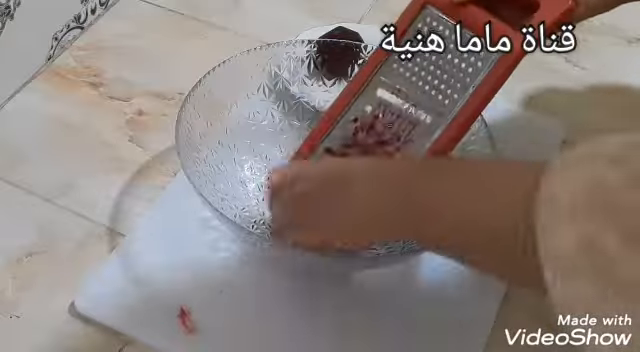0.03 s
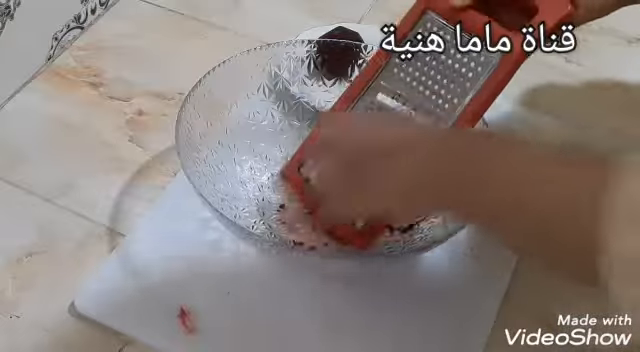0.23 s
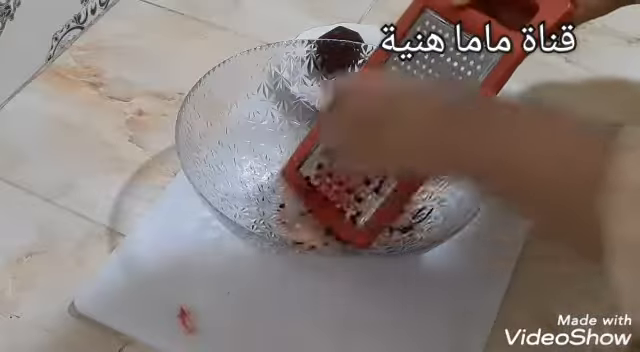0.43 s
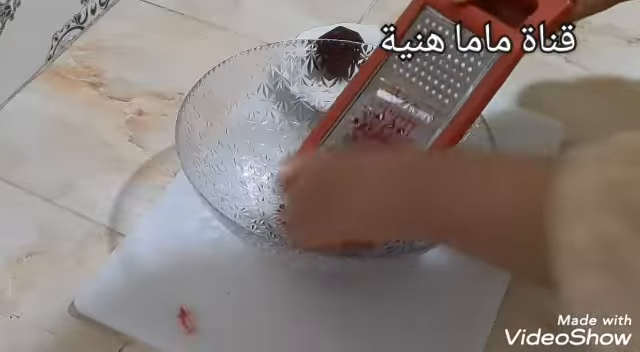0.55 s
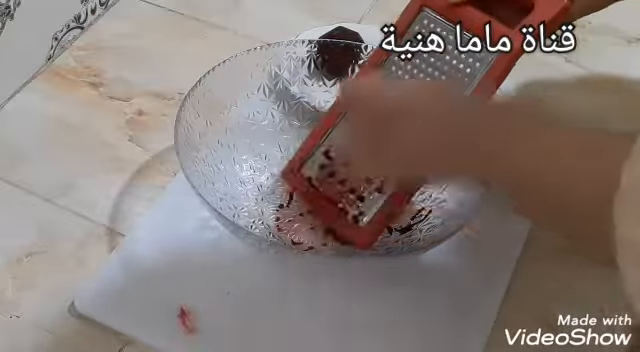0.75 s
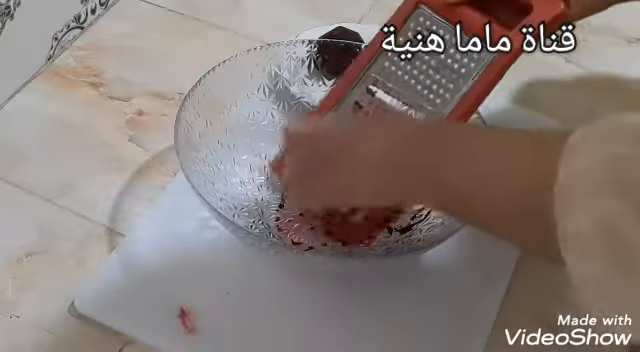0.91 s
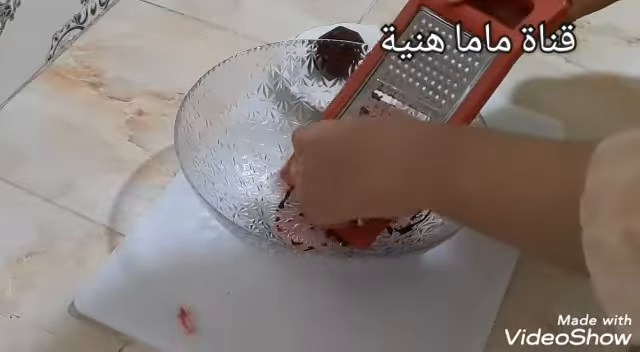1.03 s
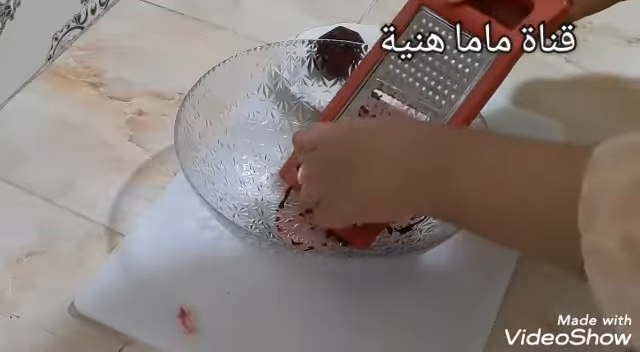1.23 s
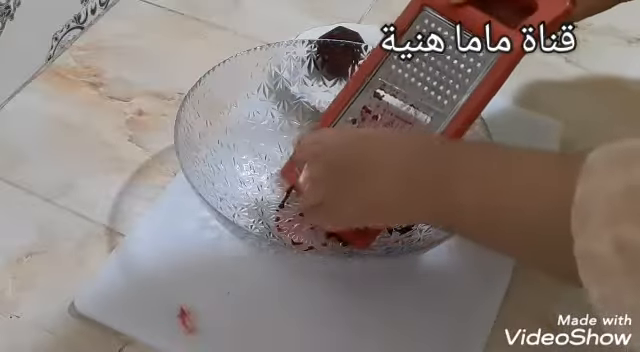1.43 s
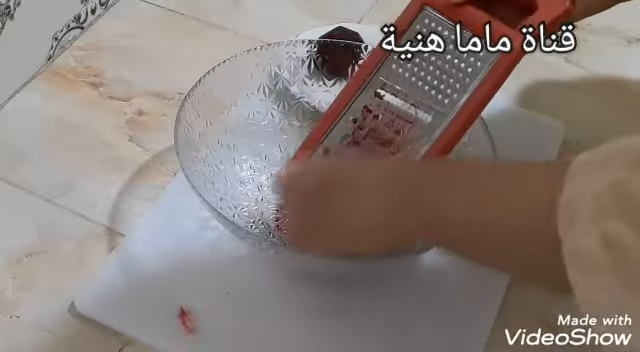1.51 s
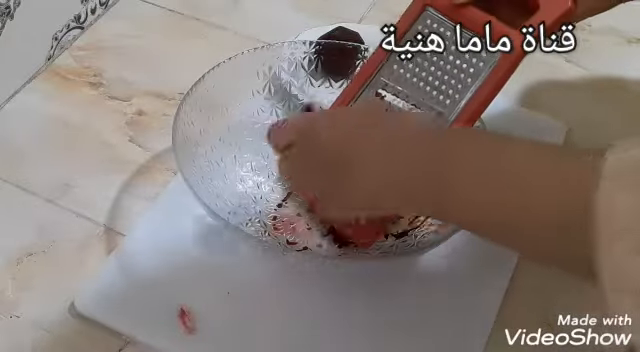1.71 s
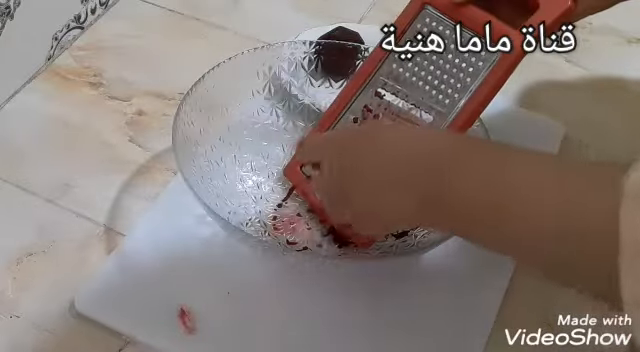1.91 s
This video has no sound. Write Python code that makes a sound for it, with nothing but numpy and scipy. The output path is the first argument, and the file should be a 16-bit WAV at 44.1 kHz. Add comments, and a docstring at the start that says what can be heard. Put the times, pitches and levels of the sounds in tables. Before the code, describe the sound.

A vegetable rasps wetly on a metal grater, which knocks against a glass bowl.

```python
"""A beetroot is pushed down a flat metal grater that stands in a glass bowl, in a hard, echoing kitchen.
The teeth tear the flesh with a wet rasp, a dense train of tiny impulses, while drag makes the frame drone.
Most strokes bump the grater on the bowl, and each impact excites the damped modes of both.
After the third full stroke the grater knocks hard; after the last one it settles with dull thuds."""
import sys
import numpy as np
from scipy import signal
from scipy.fft import rfft, irfft
from scipy.io import wavfile

SR = 44100
rng = np.random.default_rng(int(sys.argv[2]) if len(sys.argv) > 2 else 0)


def digitize_waveform(pressure):
    """Quantize a signal to 16-bit integers and store it at the path in sys.argv[1].

    Rows of a 2-D input are taken as channels; values are limited to [-1, 1].
    """
    field = np.atleast_2d(pressure).T
    bounded = np.clip(field, -1, 1)
    quanta = np.round(bounded * 32767).astype(np.int16)
    wavfile.write(sys.argv[1], SR, quanta)


N = 85995
TIME, BIN_HZ = np.arange(N) / SR, np.fft.rfftfreq(N, 1 / SR)


def from_db(db):
    """Amplitude ratio of a level in decibels."""
    return 10 ** (np.asarray(db) / 20)


def rms_one(x):
    """Normalisation to unit rms."""
    return x / np.sqrt(np.mean(x ** 2) + 1e-20)


def at_hz(points, hz):
    """Interpolation on a logarithmic frequency axis."""
    points = np.array(points)
    return np.interp(np.log(np.maximum(hz, 1)), np.log(points[:, 0]), points[:, 1])


def coloured(x, spectrum):
    """Spectral shaping of a steady sound, at unit rms."""
    return rms_one(irfft(rfft(x) * from_db(at_hz(spectrum, BIN_HZ)), N))


def butter(x, hz, kind, order=2):
    """Causal Butterworth filtering."""
    return signal.sosfilt(signal.butter(order, hz, kind, fs=SR, output="sos"), x + 1e-18)


def ring(x, hz, t60_s):
    """Damped oscillator: a unit impulse excites a decaying sine."""
    radius, angle = from_db(-60 / (t60_s * SR)), 2 * np.pi * hz / SR
    return signal.lfilter([0, np.sin(angle)], [1, -2 * radius * np.cos(angle), radius ** 2], x + 1e-18)


def click(start_s, level_db):
    """An ideal impulse."""
    return from_db(level_db) * (np.arange(N) == int(start_s * SR))


def grains(per_s, spread_db=0):
    """Shot noise: impulses of random sign at random times, equal in size at zero spread."""
    sizes = from_db(spread_db * np.minimum(rng.exponential(1, N), 5))
    return sizes * rng.choice([-1, 1], N) * (rng.random(N) < per_s / SR)


# strokes over the teeth: start_s, rise_s, hold_s, release_s, tear_db, hiss_db, drone_db
STROKES = [(-0.03, 0.023, 0.01, 0.072, -48.5, -46, -61.5), (0.189, 0.094, 0.018, 0.038, -40.5, -37, -65.5),
           (0.484, 0.062, 0.026, 0.028, -36.5, -33, -58), (0.771, 0.067, 0.019, 0.039, -37.5, -34, -53),
           (0.91, 0.025, 0.086, 0.042, -47, -51, -61), (1.454, 0.089, 0.0028, 0.031, -38, -38, -60)]


def stroke_envelope(levels_db, lag_s=0):
    """Amplitude envelope: each stroke swells, holds and decays exponentially."""
    envelope = 0
    for (start_s, rise_s, hold_s, release_s, *_), level_db in zip(STROKES, levels_db):
        age = TIME - start_s - lag_s
        swell = np.sin(np.pi / 2 * np.clip(age / rise_s, 0, 1)) ** 2
        decay = np.exp(-np.maximum(age - rise_s - hold_s, 0) / release_s)
        envelope += from_db(level_db) * swell * decay
    return envelope


# spectra of tearing fibres and of bursting cells: frequency_hz, density_db
TEAR_SPECTRUM = [(60, -16), (130, -13), (200, -22), (330, -7), (480, -12), (600, -5), (720, 0), (900, -2),
                 (1180, 1), (1500, -5), (2000, 0), (3000, -2), (3500, -7), (4500, -4), (8000, -14),
                 (14000, -28)]
HISS_SPECTRUM = [(400, -40), (1500, -20), (3000, -6), (3500, -6), (4400, 0), (6000, -1), (8200, 1.2),
                 (9200, -2), (10200, -6.5), (12300, -3), (15000, -4.5)]
# modes of the toothed sheet: pitch_hz, relative_level_db, t60_s
SHEET_MODES = [(1228, -27, .1), (2450, -25, .08), (4450, -20, .06), (8115, -22, .06)]


def rasp():
    """Modulated shot noise: fibres tear and cells burst as rows of teeth catch; the sheet resonates."""
    tear_db, hiss_db = np.transpose(STROKES)[4:6]
    catch = rms_one(butter(rng.standard_normal(N), 44.5, "low"))
    tear_flutter, hiss_flutter = from_db(1.5 * catch), from_db(3.5 * catch)
    # juice hisses first; the flesh tears once the teeth are in
    tear = coloured(grains(per_s=1500), TEAR_SPECTRUM) * stroke_envelope(tear_db, lag_s=0.0027)
    hiss = coloured(grains(per_s=6000), HISS_SPECTRUM) * stroke_envelope(hiss_db, lag_s=-0.0038)
    cutting = tear * tear_flutter + hiss * hiss_flutter
    sheet = sum(from_db(db) * rms_one(ring(cutting, hz, t60_s)) for hz, db, t60_s in SHEET_MODES)
    return cutting + np.std(cutting) * sheet


# low modes of frame, bowl and table: pitch_hz, gain_db, t60_s
FRAME_MODES = [(77, -14, .25), (103, -10, .18), (131, -7, .18), (157, -12, .15), (245, 1, .1),
               (318, 8, .075), (346, 1, .1)]


def frame():
    """Forced and free vibration: the low modes drone under drag and thud just after each knock."""
    drone_db, thud_lag_s = np.transpose(STROKES)[-1], 0.007
    drag = from_db(-24) * rng.standard_normal(N) * stroke_envelope(drone_db)
    blows = sum(click(start_s + thud_lag_s, thud_db) for start_s, *_, thud_db in KNOCKS)
    force = butter(blows + drag, 420, "low", order=4)
    return sum(from_db(db) * ring(force, hz, t60_s) for hz, db, t60_s in FRAME_MODES)


# likeness of the room's sound at the two ears: frequency_hz, correlation
EAR_CORRELATION = [(80, 0.98), (160, 0.93), (300, 0.5), (600, 0.98), (1100, -0.19), (3000, 0.014),
                   (12000, -0.016)]


def diffuse_noise():
    """Diffuse field: white stereo noise, correlated between the ears mainly at low frequencies."""
    correlation = at_hz(EAR_CORRELATION, BIN_HZ)
    mid, side = rfft(rng.standard_normal((2, N)))
    mid_gain, side_gain = np.sqrt((1 + correlation) / 2), np.sqrt((1 - correlation) / 2)
    return irfft(mid_gain * mid + side_gain * side * [[1], [-1]], N)


# spectrum of the room's background: frequency_hz, density_db
BACKGROUND_SPECTRUM = [(25, 1), (45, -21.5), (75, 6), (125, 7), (190, -9), (330, -3.5), (550, -22),
                       (1500, -11.5), (4000, -26.5), (8000, -22), (11000, -30), (14000, -29)]


def background():
    """Ambient noise: a faint, steady diffuse field, strongest in the bass."""
    return from_db(-60) * coloured(diffuse_noise(), BACKGROUND_SPECTRUM)


# reverberation time of the kitchen: frequency_hz, t60_s
ROOM_T60 = [(100, 1), (300, 1), (1000, 0.56), (2500, .58), (5000, 0.51), (9000, 0.46), (15000, 0.27)]
# spectrum of its echoes: frequency_hz, gain_db
ROOM_COLOUR = [(100, 0), (190, -2), (350, 0), (650, 0), (1200, 1), (2300, 1), (4300, 0), (12000, 0)]


def kitchen_response():
    """Reverberation: dense echoes decay exponentially in each band, the treble fastest."""
    gap_s = build_s = 0.00067
    build_up = 1 - np.exp(-np.maximum(TIME - gap_s, 0) / build_s)
    early_boost = 1 + from_db(-0.5) * np.exp(-TIME / 0.016)  # reflections from table and near walls
    noise_spectrum = rfft(diffuse_noise())
    centres_hz = np.geomspace(100, 15000, 9)
    response = 0
    for centre_hz, one_band in zip(centres_hz, np.eye(len(centres_hz))):
        share = np.interp(BIN_HZ, centres_hz, one_band)
        decay = from_db(-60 * TIME / at_hz(ROOM_T60, centre_hz))
        band = irfft(noise_spectrum * share, N) * build_up * early_boost * decay
        band *= np.sqrt(2 * np.mean(share ** 2) / np.sum(band ** 2))  # energy follows bandwidth
        response += band * from_db(at_hz(ROOM_COLOUR, centre_hz))
    return response


def in_kitchen(x, direct_db, room_db, right_lag_s=0.00034):
    """Direct and reverberant field: a source reaches the left ear first, then its own echoes follow."""
    direct = np.array([x, np.interp(TIME - right_lag_s, TIME, x)])
    echoes = signal.fftconvolve(x[None], kitchen_response(), axes=1)[:, :N]
    return from_db(direct_db) * direct + from_db(room_db) * echoes


# impacts of grater on bowl: start_s, level_db, pitch_hz, crack_relative_db, thud_db
KNOCKS = [(0.2011, -35.5, 670, -11, -41.5), (0.268, -29, 970, -17, -44.5), (0.4882, -29.5, 760, -9, -40.5),
          (0.7777, -30, 890, -9, -45.5), (0.941, -41, 920, -10, -64), (0.9784, -14, 980, -4.5, -37.5),
          (1.569, -61, 400, -2, -39.5), (1.659, -26.5, 218, -30, -43), (1.6652, -29, 1060, 0.5, -62),
          (1.6786, -26, 570, -13, -61.5)]
# modes of the glass bowl: pitch_hz, gain_db, t60_s
BOWL_MODES = [(392, -18.5, 0.08), (597, -23, 0.13), (680, -23.5, .08), (809.5, -35, 0.24), (975, -41.5, .1),
              (1168, -34, 0.069), (1762, -17, 0.049), (2430, -30, 0.043)]


def knocks():
    """Impact excitation: each contact clacks, pitched by hardness, and rings the bowl; hard ones crack."""
    edge_ratio, crack_lag_s = 1.472, 0.0007
    clack = sum(butter(click(start_s, db), [hz / edge_ratio, hz * edge_ratio], "band", order=3)
                for start_s, db, hz, *_ in KNOCKS)
    force = sum(click(start_s, db) for start_s, db, *_ in KNOCKS)
    bowl = sum((-1) ** k * from_db(db) * ring(force, hz, t60_s)
               for k, (hz, db, t60_s) in enumerate(BOWL_MODES))
    snap = sum(click(start_s + crack_lag_s, db + crack_db) for start_s, db, _, crack_db, _ in KNOCKS)
    crack = butter(snap, [1590, 3800], "band", order=3)
    tick = butter(snap, 8200, "low")
    return from_db(32) * clack + bowl + from_db(18.5) * crack + from_db(10.5) * tick


# landings of the beetroot on the teeth: start_s, level_db
LANDINGS = [(0.49, -42), (0.78, -40), (1.465, -41.5)]


def crunches(decay_s=0.003):
    """Contact transient: a burst of band-limited noise as the beetroot meets the teeth."""
    envelope = sum(from_db(db) * (TIME >= start_s) * np.exp(-np.abs(TIME - start_s) / decay_s)
                   for start_s, db in LANDINGS)
    return envelope * rms_one(butter(rng.standard_normal(N), [1350, 2600], "band"))


def scene():
    """Superposition: spots on the grater rasp incoherently over frame and bowl, a little to the left."""
    spots, left_louder_db = 3, 1.0
    grating = sum(in_kitchen(rasp(), direct_db=-5, room_db=3) for _ in range(spots)) / np.sqrt(spots)
    impacts = in_kitchen(knocks() + crunches(), direct_db=0, room_db=-2.5)
    drone_and_thuds = in_kitchen(frame(), direct_db=-8.5, room_db=0)
    balance = from_db([[left_louder_db / 2], [-left_louder_db / 2]])
    return (grating + impacts + drone_and_thuds) * balance + background()


def record(dry):
    """Band limiting: the microphone loses the deepest bass, and the top treble is cut steeply."""
    low_cut_hz, high_cut_hz = 55, 15900
    thinned = butter(dry, low_cut_hz, "high", order=3)
    return signal.sosfilt(signal.ellip(12, 0.1, 80, high_cut_hz, fs=SR, output="sos"), thinned)


dry = scene()
out = record(dry)
digitize_waveform(out)
```